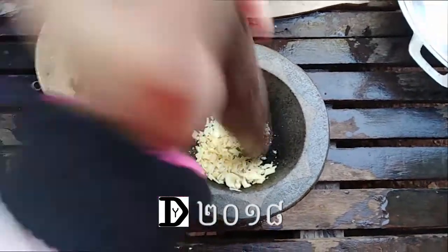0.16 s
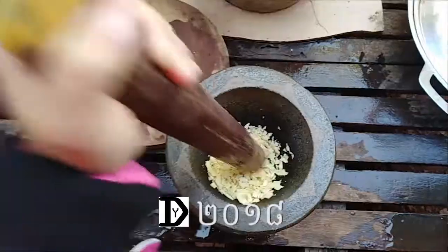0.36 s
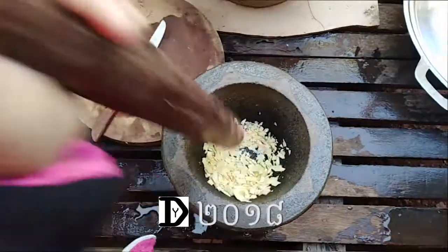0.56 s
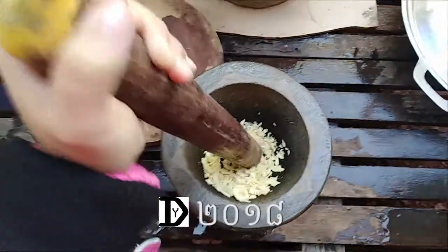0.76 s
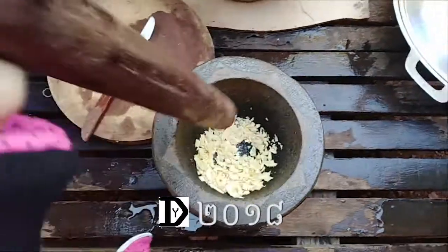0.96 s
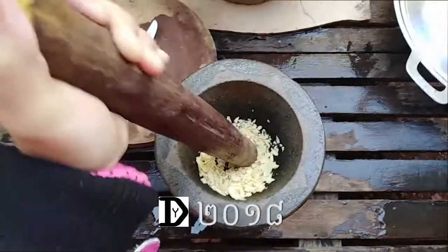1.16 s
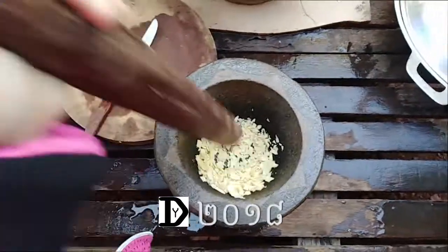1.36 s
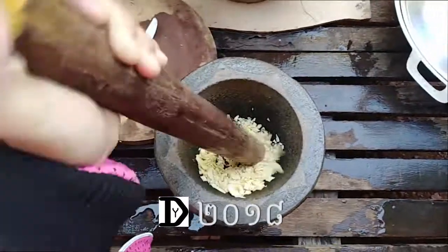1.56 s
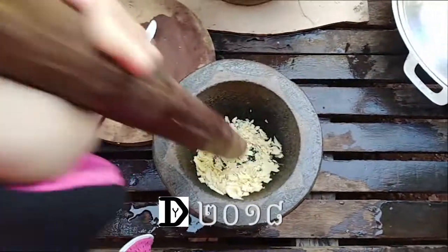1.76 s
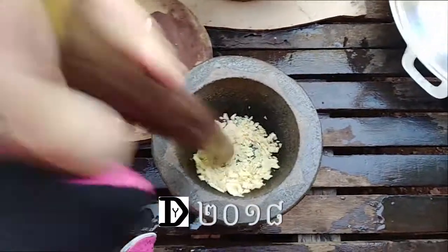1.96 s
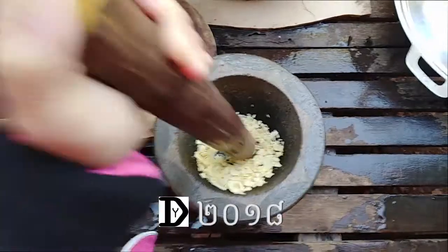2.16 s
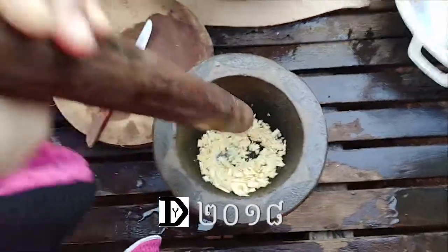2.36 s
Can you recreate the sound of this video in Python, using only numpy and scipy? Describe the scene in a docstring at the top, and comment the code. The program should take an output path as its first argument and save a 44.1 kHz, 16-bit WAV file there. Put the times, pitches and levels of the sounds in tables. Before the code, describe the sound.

Five steady knocks of a wooden pestle crushing roots in a stone mortar, faint bird peeping outdoors

```python
"""On a plank deck outdoors, a wooden pestle pounds chopped roots in a stone mortar, five blows at an even pace.
All five crunch, the first loudest: it meets bare stone, rings as a sum of modes and clips; the later four are
cushioned. Crunches and the rustle of loose bits as the pestle lifts are random click trains shaped by filters.
A small bird peeps in falling notes some way off, mostly as reflections, over low rumble and a narrow-band hum."""
import sys
import numpy as np
from scipy import signal
from scipy.fft import rfft, irfft
from scipy.io import wavfile

SR = 44100
rng = np.random.default_rng(int(sys.argv[2]) if len(sys.argv) > 2 else 0)


def materialize(psi):
    """Save the field psi as 16-bit PCM at rate SR to the path in sys.argv[1].

    A 1-D psi becomes a single channel; in a 2-D psi each row is a channel.
    """
    bounded = np.clip(np.atleast_2d(psi).T, -1, 1)
    quanta = np.round(bounded * 32767).astype(np.int16)
    wavfile.write(sys.argv[1], SR, quanta)


N = 105840
T = np.arange(N) / SR  # s


def from_db(db):
    """Logarithmic level: 20 dB is a tenfold amplitude."""
    return 10 ** (np.asarray(db) / 20)


def rms_one(x):
    """Normalization: scale to unit root-mean-square amplitude."""
    return x / np.sqrt(np.mean(x ** 2) + 1e-20)


def colour(x, points):
    """Minimum-phase filtering: a causal response through (f/Hz, level/dB) points, by way of the cepstrum."""
    hz, db = np.transpose(points)
    size = 2 ** 17
    f = np.maximum(np.arange(size // 2 + 1) * SR / size, 1)
    log_gain = np.log(from_db(np.interp(np.log(f), np.log(hz), db)))
    cepstrum = irfft(log_gain)
    # Folding the cepstrum onto positive times makes the filter causal
    cepstrum[1:size // 2] *= 2
    cepstrum[size // 2 + 1:] = 0
    response = np.exp(rfft(cepstrum))
    return irfft(rfft(x, size) * response)[..., :N]


def dying(s, t60):
    """Exponential decay: a unit step at s that falls 60 dB in t60 seconds."""
    return (T >= s) * from_db(-60 * np.maximum(T - s, 0) / t60)


def swell(s, rise, hold, t60):
    """Envelope: linear attack, hold and exponential release."""
    release = s + rise + hold
    attack = np.clip((T - s) / rise, 0, 1)
    return attack * np.where(T < release, 1, dying(release, t60))


def ring(s, hz, t60):
    """Damped oscillation: one struck mode as a decaying sine."""
    return np.sin(2 * np.pi * hz * (T - s)) * dying(s, t60)


def stereo_noise(side_share=0.28):
    """Partial coherence: a shared white noise plus a share of another in opposite signs left and right."""
    mid, side = rng.standard_normal((2, N))
    return rms_one(mid + side_share * side * np.array([[1], [-1]]))


def noise(points):
    """Spectral shaping: coloured stereo noise of unit rms."""
    return rms_one(colour(stereo_noise(), points))


def echoes(x, rise, t60):
    """Diffuse reverberation: convolution with a decaying noise response of unit mean energy."""
    response = stereo_noise(side_share=0.96) * swell(.002, rise, 0, t60)
    response = rms_one(response) / np.sqrt(N)
    return signal.fftconvolve(np.atleast_2d(x), response, axes=1)[:, :N]


# Partials of the distant hum: (f/Hz, level/dB before the changes below)
HUM_PARTIALS = [(118, -50.5), (147, -48.5), (236, -64.5), (355, -58)]
# Slow wavering of the hum: (t/s, level change/dB)
HUM_WAVER = [(0, -14), (.6, 1), (.88, 7), (1.1, 2.5), (1.25, 2.5), (1.8, -1), (2.4, -1)]
# Spectrum of the outdoor rumble: (f/Hz, relative level per Hz/dB)
RUMBLE_SPECTRUM = [(15, -49.5), (30, -32), (45, -17.5), (68, 0.5), (120, -4), (200, -9.5), (360, -11.5),
                   (520, -15), (680, -25.5), (1100, -21.5), (1900, -25.5), (2550, -17), (3300, -30.5),
                   (4600, -53.5), (6300, -50.5), (7500, -67.5), (15000, -82.5)]
# Course of the rumble: (t/s, level/dB)
RUMBLE_COURSE = [(0, -40), (.15, -53), (.35, -46.5), (.9, -44), (1.4, -44.5), (1.9, -45.5), (2.4, -43)]
HUM_WIDTH_HZ = 11.5


def background():
    """Narrow-band noise: slow noises modulate carriers into a hum, over a broadband outdoor rumble."""
    narrow = signal.butter(2, HUM_WIDTH_HZ / 2, fs=SR, output="sos")
    hum = 0
    for hz, db in HUM_PARTIALS:
        # The first second is dropped while the filter settles
        a, b = signal.sosfilt(narrow, rng.standard_normal((2, N + SR)))[:, SR:]
        partial = a * np.sin(2 * np.pi * hz * T) + b * np.cos(2 * np.pi * hz * T)
        hum = hum + from_db(db) * rms_one(partial)
    hum = hum * from_db(np.interp(T, *np.transpose(HUM_WAVER)))
    rumble = noise(RUMBLE_SPECTRUM) * from_db(np.interp(T, *np.transpose(RUMBLE_COURSE)))
    return hum + rumble


# Loose bits rustle as the pestle lifts: (t/s, level/dB, hold/s)
LIFT_RUSTLES = [(0.0, -55, .04), (0.075, -52.5, 0.0062), (0.333, -44, 0.023), (0.401, -42, .008),
                (0.728, -40, 0.035), (0.7737, -40.5, .008), (1.199, -40, .004), (1.224, -44, 0.016),
                (1.265, -44, 0.0058), (1.295, -48.5, 0.0053), (1.653, -38.5, 0.0035), (1.678, -38.5, 0.011),
                (2.078, -37.5, 0.0055), (2.108, -46, 0.004)]
# Spectrum of the rustle: (f/Hz, relative level/dB)
RUSTLE_SPECTRUM = [(300, -16.5), (1000, 0), (2500, 8), (3500, 5), (4700, 6.5), (6000, -6.5), (7500, -2),
                   (9500, -22), (14000, -29.5)]
# Roots are crushed under the pestle: (t/s, level/dB, hold/s)
ROOT_CRUNCHES = [(0.2067, -13, 0.0023), (0.6372, -28, 0.0086), (0.648, -34.5, 0.021), (0.67, -27, 0.0027),
                 (1.109, -22, 0.0021), (1.119, -34.5, 0.021), (1.54, -31.5, 0.016), (1.5527, -31, 0.011),
                 (1.572, -36.5, 0.0066), (1.9738, -19, 0.0027), (1.984, -26.5, .013)]
# Spectrum of the crunch: (f/Hz, relative level/dB)
CRUNCH_SPECTRUM = [(200, -34.5), (700, -11), (1500, -13), (3000, 3), (5000, -3), (7000, 0), (9500, -7.5),
                   (12000, -11.5), (14500, -22.5)]
GRAINS_PER_S, GRAIN_SPREAD_DB = 7000, 3
RUSTLE_RISE_S, RUSTLE_T60_S = .002, 0.12
CRUNCH_RISE_S, CRUNCH_T60_S = 0.0004, 0.024


def roots():
    """Random impulse train: fibres snap in dense bursts of tiny clicks, and loose bits rustle."""
    sizes = from_db(GRAIN_SPREAD_DB * np.minimum(rng.exponential(1, N), 4))
    happens = rng.random(N) < GRAINS_PER_S / SR
    snaps = stereo_noise(side_share=0.67) * sizes * happens
    pressure = sum(from_db(db) * swell(s, CRUNCH_RISE_S, hold, CRUNCH_T60_S)
                   for s, db, hold in ROOT_CRUNCHES)
    lifting = sum(from_db(db) * swell(s, RUSTLE_RISE_S, hold, RUSTLE_T60_S)
                  for s, db, hold in LIFT_RUSTLES)
    crunch = rms_one(colour(snaps, CRUNCH_SPECTRUM)) * pressure
    rustle = rms_one(colour(snaps, RUSTLE_SPECTRUM)) * lifting
    return crunch + rustle


# Blows, also played by mortar() and deck(): (t/s, knock level/dB, hollow note level/dB, note f/Hz, note t60/s,
# note right against left before the right-channel filter/dB, dense ring level/dB, thud level/dB, thud rise/s)
PESTLE_BLOWS = [(0.2080, -7.5, -5, 1121, 0.14, 4, -11, -24, 0.0038),
                (0.64, -41, -37, 1215, .05, -7.5, -35.5, -30.5, 0.051),
                (1.1114, -20.5, -17.5, 1211, 0.054, 4.5, -32.5, -29, 0.0135),
                (1.5437, -28.5, -37.5, 1230, 0.17, -3, -34, -35, 0.06),
                (1.9770, -8, -7, 1209, 0.041, -6.5, -41, -28.5, .015)]
# Light wooden taps: (t/s, knock level/dB)
WOOD_TAPS = [(0.616, -34.5), (2.298, -27.5)]
# Spectrum of the knock: (f/Hz, relative level/dB)
KNOCK_SPECTRUM = [(20, -44.5), (60, -37), (200, -8), (450, 3.5), (720, 11), (1100, 5.5), (1600, -3.5),
                  (3500, -25.5), (8000, -45)]
RATTLE_DB, RATTLE_T60_S = -19, 0.0047  # level against the knock


def knocks():
    """Impulse response: blows and taps excite a short dull pulse; blows add a hollow note.

    The note is higher when the pestle stays pressed in."""
    hits = [(s, db) for s, db, *_ in PESTLE_BLOWS + WOOD_TAPS]
    clicks = np.zeros(N)
    for s, db in hits:
        clicks[int(s * SR)] += from_db(db)
    single = colour(1. * (T == 0), KNOCK_SPECTRUM)
    pulses = colour(clicks, KNOCK_SPECTRUM) / np.abs(single).max()
    bursts = sum(from_db(db + RATTLE_DB) * dying(s, RATTLE_T60_S) for s, db in hits)
    rattle = noise(KNOCK_SPECTRUM) * bursts
    note = sum(from_db([[db], [db + lean_db]]) * ring(s, hz, t60)
               for s, _, db, hz, t60, lean_db, *_ in PESTLE_BLOWS)
    return pulses + rattle + note


# Spectrum of the deck thud: (f/Hz, relative level per Hz/dB)
THUD_SPECTRUM = [(20, -41.5), (45, -24.5), (75, -13), (115, 1.5), (190, 2), (280, -2), (400, -3),
                 (600, -17), (1200, -16), (4000, -71)]
DECK_HZ, DECK_T60_S, THUD_T60_S = 122, 0.17, 0.48  # the lowest plank mode, and the thud around it


def deck():
    """Structure-borne sound: each blow drives the lowest plank mode and a band of low noise."""
    boom = sum(from_db(db) * ring(s, DECK_HZ, DECK_T60_S) for s, *_, db, _ in PESTLE_BLOWS)
    level = sum(from_db(db) * swell(s, rise, 0, THUD_T60_S) for s, *_, db, rise in PESTLE_BLOWS)
    return boom + noise(THUD_SPECTRUM) * level


# The pestle touches the stone: (t/s, relative level/dB, ring t60/s, cushioning by roots/0-1)
STONE_TOUCHES = [(0.2087, 2.5, 0.22, 0), (0.633, -17, 0.032, 0.9), (0.6473, -17, 0.038, 0.8),
                 (0.6561, -5.5, .035, 0.87), (1.1160, -4, 0.038, 0.9), (1.1340, -12, .03, 0.8),
                 (1.5433, -4.5, 0.044, 1), (1.5534, 1, 0.018, 1), (1.5737, -5, 0.026, 1),
                 (1.9759, 8, 0.021, 0.59)]
# Modes of the mortar: (f/Hz, relative level/dB, share of the ring t60)
MORTAR_MODES = [(1616, -28, 1), (1737, -24, 1), (1776, -24, 1), (1908, -28, 1), (2395, -26, 1),
                (2513, -8, .9), (2593, -7, 1.1), (2682, -14, 1), (2718, -15, 1), (2788, -18, .9),
                (3185, -27, .9), (4064, -32, .8)]
# Spectrum of the dense ring: (f/Hz, relative level per Hz/dB)
DENSE_SPECTRUM = [(40, -45.5), (200, -24.5), (550, -2.5), (720, 8.5), (930, -14), (1150, 10), (1400, 4),
                  (1800, 12.5), (2200, 3), (2600, 12), (3300, -16), (4300, -15), (6000, -32.5),
                  (14000, -56.5)]
MAIN_MODE_HZ, CUSHION_DB = 2593, 28.5  # full cushioning takes this much from all but the main mode
CUSHIONED_RISE_S = 0.0013  # for full cushioning
DENSE_RISE_S, DENSE_T60_S = 0.00048, 0.26


def mortar():
    """Modal superposition: the stone rings in damped modes; its many weak ones blur into a dense ring.

    Roots damp a touch until it rings briefly and nearly on one note."""
    modes = 0
    for s, db, t60, cushion in STONE_TOUCHES:
        attack = np.clip((T - s) / (CUSHIONED_RISE_S * max(cushion, .1)), 0, 1)
        for hz, mode_db, share in MORTAR_MODES:
            distance = min(abs(hz - MAIN_MODE_HZ) / 80, 1)  # no loss at the main mode, full 80 Hz away
            loss_db = CUSHION_DB * np.clip(cushion, 0, 1) * distance
            modes = modes + from_db(db + mode_db - loss_db) * attack * ring(s, hz, t60 * share)
    dense = sum(from_db(db) * swell(s, DENSE_RISE_S, 0, DENSE_T60_S)
                for s, *_, db, _, _ in PESTLE_BLOWS)
    return modes + noise(DENSE_SPECTRUM) * dense


# Peeps: (t/s, starting level/dB, starting f/Hz, level gained by the end/dB)
BIRD_PEEPS = [(0.998, -35.5, 3200, 0.5), (1.235, -43.5, 3400, 12), (1.455, -53, 3400, 18.5),
              (1.725, -36.5, 3200, -3.5), (1.98, -43, 3013, 6), (2.306, -36, 3150, -6.5)]
PEEP_END_HZ, PEEP_FALL_S = 2350, .042
PEEP_S, PEEP_RISE_S, PEEP_T60_S = .09, .02, 0.057  # hold, attack, release
WOBBLE_DEPTH, WOBBLE_CUTOFF_HZ = 0.01, 138  # depth is scaled below by the height of the pitch
PEEP_DIRECT_DB, ECHO_RISE_S, ECHO_T60_S = -5, 0.0057, 0.28


def bird():
    """Frequency modulation: slightly hoarse notes fall and level out, heard mostly through reflections."""
    slow = signal.butter(2, WOBBLE_CUTOFF_HZ, fs=SR, output="sos")
    wobble = rms_one(signal.sosfilt(slow, rng.standard_normal(N)))
    song = 0
    for s, db, start_hz, gain_db in BIRD_PEEPS:
        height = np.exp(-(np.maximum(T - s, 0) / PEEP_FALL_S) ** 1.59)  # from 1 to 0
        glide_hz = PEEP_END_HZ + (start_hz - PEEP_END_HZ) * height
        hz = glide_hz * (1 + WOBBLE_DEPTH * wobble * (0.29 + 1.433 * height))
        level = from_db(db + gain_db * np.clip((T - s) / PEEP_S, 0, 1))
        envelope = swell(s, PEEP_RISE_S, PEEP_S, PEEP_T60_S)
        song = song + level * envelope * np.sin(2 * np.pi * np.cumsum(hz) / SR)
    return from_db(PEEP_DIRECT_DB) * song + echoes(song, ECHO_RISE_S, ECHO_T60_S)


# Colour of the late reflections: (f/Hz, gain/dB)
TAIL_FILTER = [(100, 5), (600, 9.5), (1200, -2.5), (2600, -3), (4500, -4.5), (7500, -12.5), (13000, -20.5)]
# Right-channel filter for the pounding: (f/Hz, gain/dB)
RIGHT_CLOSE_FILTER = [(100, -5), (500, 1.5), (900, -14.5), (1200, -6), (1700, -10.5), (2600, -18.5),
                      (3500, -11.5), (4700, -3.5), (6500, 4.5), (9000, 0.5), (13000, 0)]
# Right-channel filter for bird and background: (f/Hz, gain/dB)
RIGHT_FAR_FILTER = [(100, -1.5), (400, -5), (1000, -10), (2500, -20), (6000, 16)]
NEAR_DB, NEAR_RISE_S, NEAR_T60_S = -15, 0.0036, 0.18
TAIL_DB, TAIL_RISE_S, TAIL_T60_S = -22.5, 0.037, 0.45
CRUNCH_SEND_DB = 14.5  # extra level of the roots into the tail
LEFT_LAG_S = .0002


def scene():
    """Superposition: direct sound, early and late reflections, with a time and level difference in stereo."""
    struck = knocks() + mortar()
    crunch = roots()
    near = from_db(NEAR_DB) * echoes(struck + crunch, NEAR_RISE_S, NEAR_T60_S)
    sent = struck + from_db(CRUNCH_SEND_DB) * crunch
    tail = from_db(TAIL_DB) * colour(echoes(sent, TAIL_RISE_S, TAIL_T60_S), TAIL_FILTER)
    close = struck + crunch + deck() + near + tail
    far = bird() + background()
    samples = np.arange(N)
    left = np.interp(samples - round(LEFT_LAG_S * SR), samples, close[0] + far[0])
    right = colour(close[1], RIGHT_CLOSE_FILTER) + colour(far[1], RIGHT_FAR_FILTER)
    return np.array([left, right])


LOW_CUT_HZ, CUTOFF_HZ = 40, 14600


def record(dry):
    """Overload and band limiting: the loudest peaks clip; the deepest bass and the top are cut."""
    clipped = np.clip(dry, -1, 1)
    low_cut = signal.butter(2, LOW_CUT_HZ, "high", fs=SR, output="sos")
    top_cut = signal.ellip(12, .1, 80, CUTOFF_HZ, fs=SR, output="sos")
    return signal.sosfilt(top_cut, signal.sosfilt(low_cut, clipped))


dry = scene()
out = record(dry)
materialize(out)
```